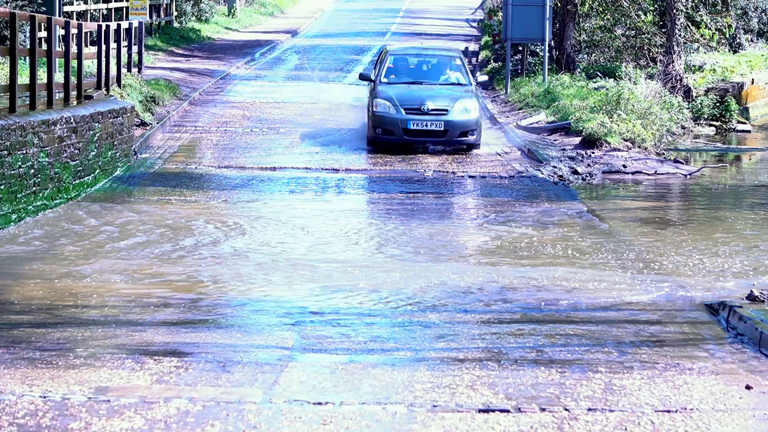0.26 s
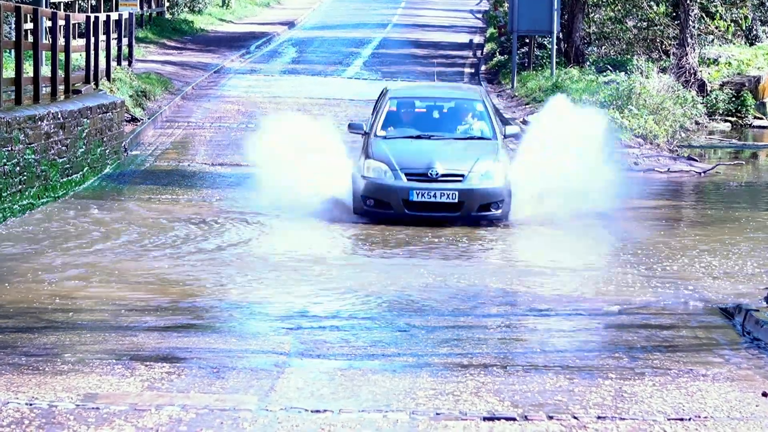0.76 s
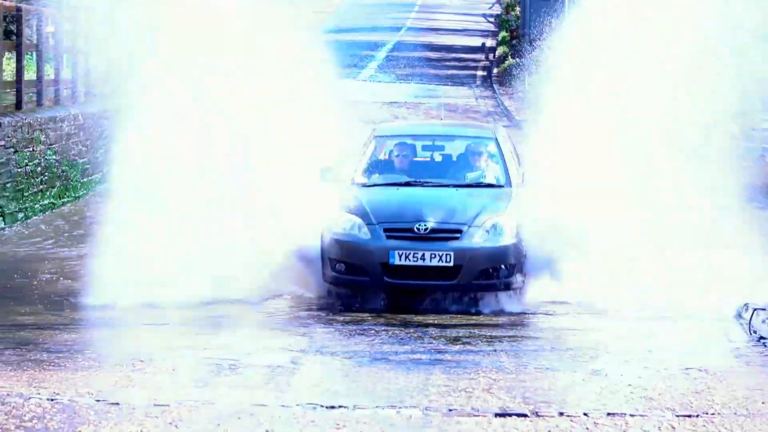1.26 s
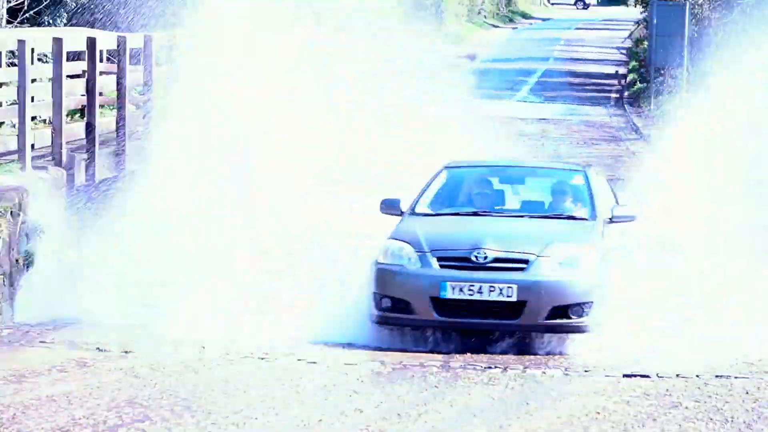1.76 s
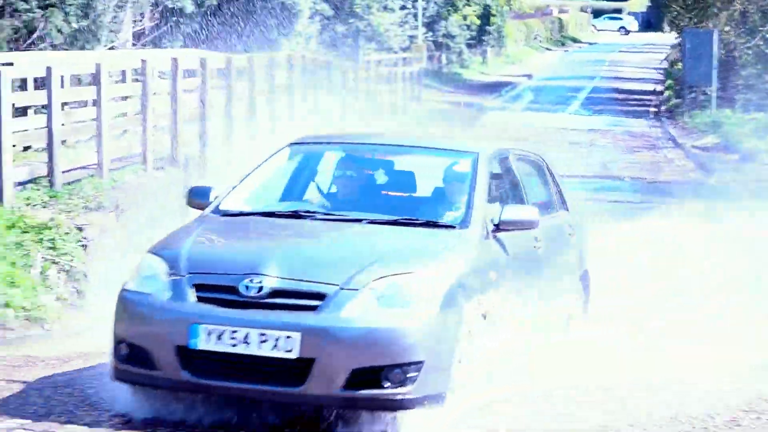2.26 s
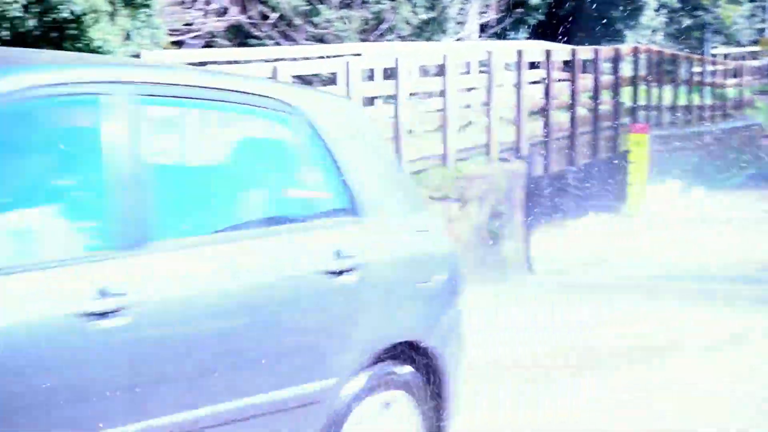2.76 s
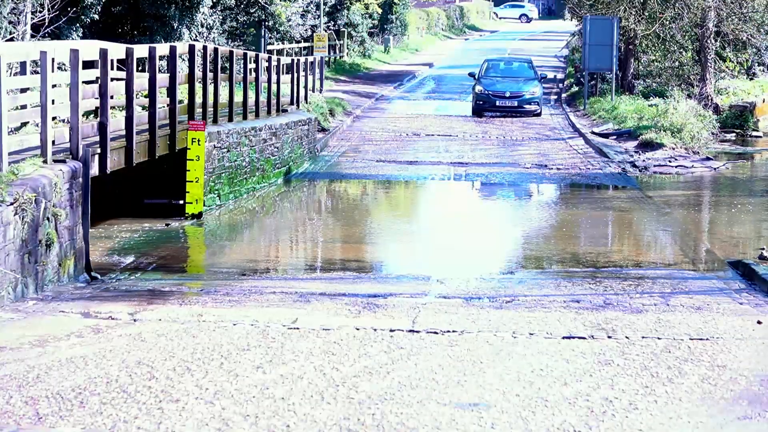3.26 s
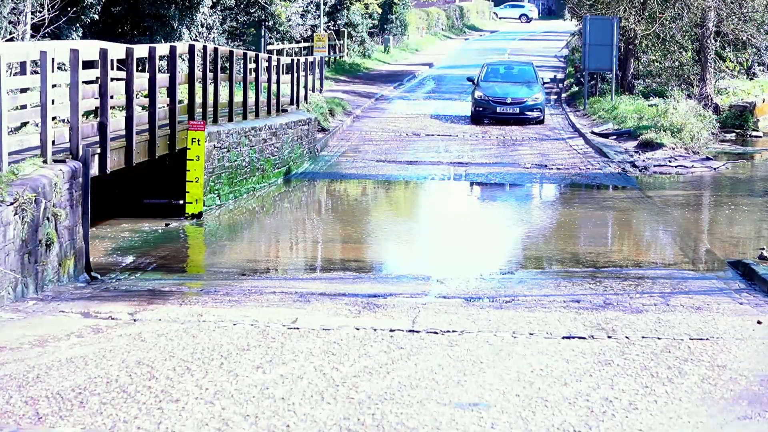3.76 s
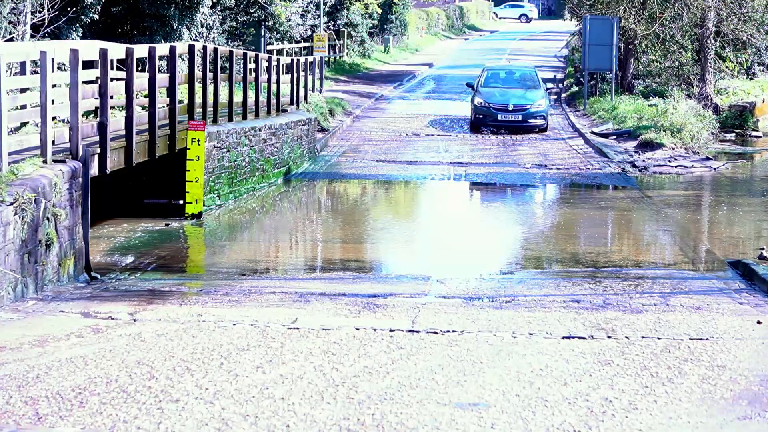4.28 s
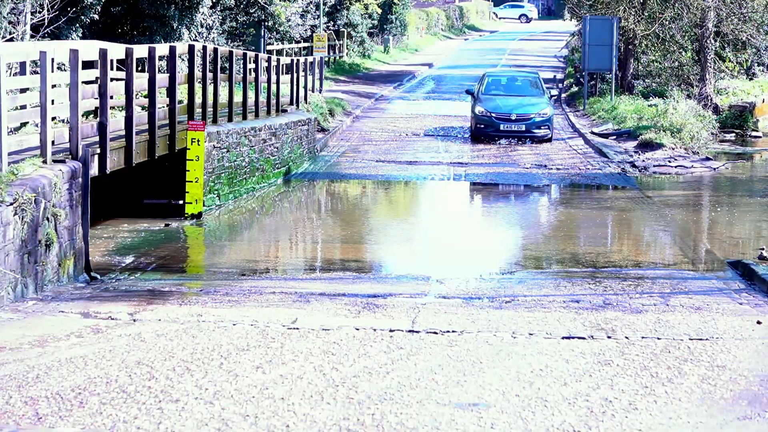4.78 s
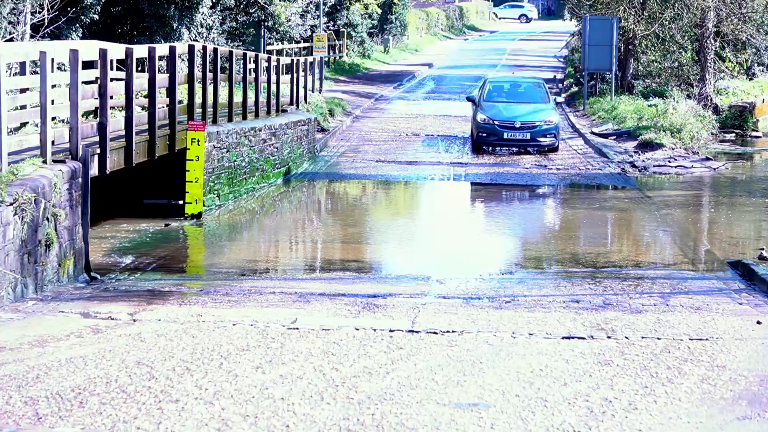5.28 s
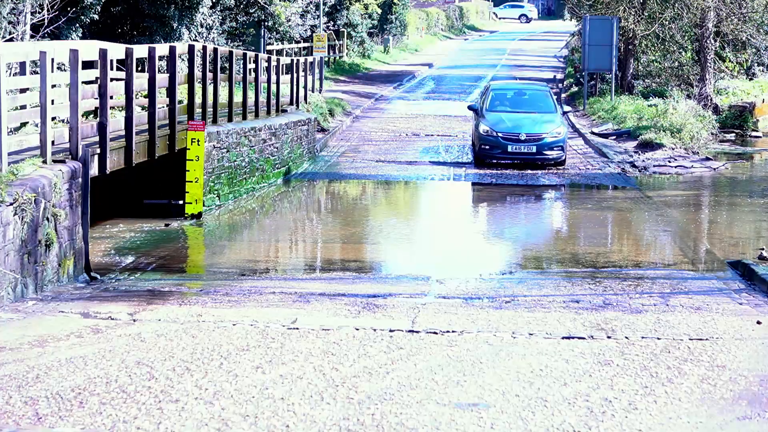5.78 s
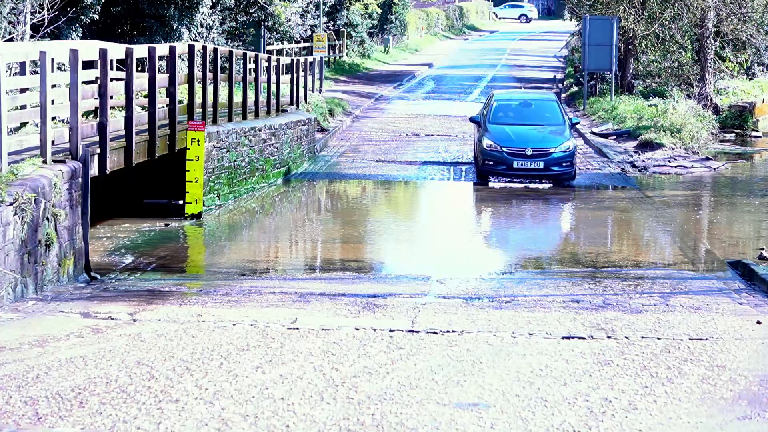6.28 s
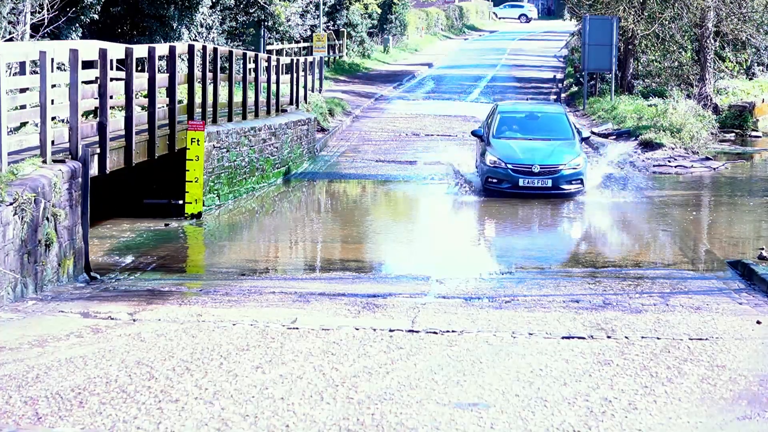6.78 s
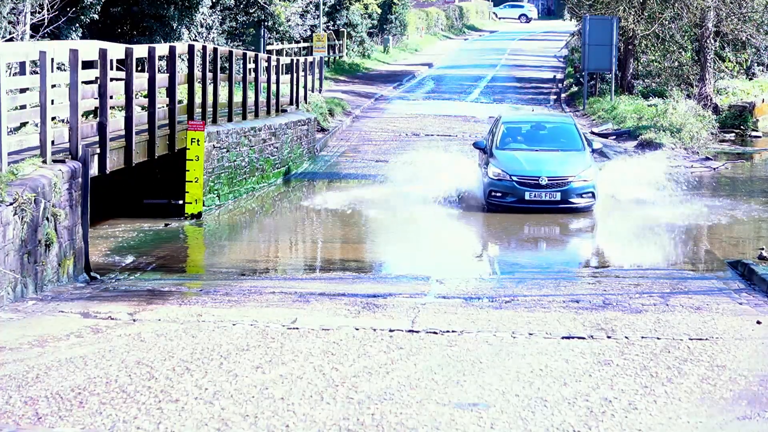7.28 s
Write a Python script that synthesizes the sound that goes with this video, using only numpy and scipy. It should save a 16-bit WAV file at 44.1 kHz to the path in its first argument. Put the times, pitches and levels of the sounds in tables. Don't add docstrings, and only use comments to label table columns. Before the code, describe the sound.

A fast car rushes through a shallow ford close to the microphone, its body booming and knocking while tyre roar becomes broad, fizzing spray with sharp slaps of water. It swells as the car passes, then cuts abruptly to a much quieter country lane: feet scrape and crunch on grit, small birds chirp with a light echo off trees, traffic hums far off, and a slow car enters the water with a soft wash and low bump.

```python
import sys
import numpy as np
from scipy import signal
from scipy.fft import rfft, irfft, next_fast_len
from scipy.io import wavfile
from scipy.ndimage import uniform_filter1d

SR = 44100
rng = np.random.default_rng(int(sys.argv[2]) if len(sys.argv) > 2 else 0)


def persist_wave(psi):
    counts = np.round(np.clip(psi, -1, 1) * 32767).astype(np.int16)
    wavfile.write(sys.argv[1], SR, np.atleast_2d(counts).T)


def volts_from_db(level):
    exponent = np.asarray(level, float) / 20
    return 10 ** exponent


N = 332514

START_S, CUT_S = 0.047, 2.8335

# (time [s], tyre roar [dB], stage [0-2])
FAST_PASS = [(0.05, -26.5, 0.069), (0.45, -27, 0.2), (0.88, -23, 0.97), (1.1, -25, 1.02), (1.3, -24.5, 1.4),
             (1.7, -25, 1.58), (1.97, -24, 1.38), (2.1, -21.5, 1.59), (2.5, -20.5, 1.54),
             (2.63, -19.5, 1.54), (2.67, -21.5, 1.4), (2.73, -20.5, 1.32), (2.84, -19.5, 1.8)]
# (frequency [Hz], level [dB])
FAST_RUMBLE_FAR = [(12, -52), (45, -35), (62, -2), (97, 4.5), (144, -0.5), (172, -1), (243, -2), (309, -3),
                   (365, -15.5), (420, -11.5), (550, -7.5), (920, -120)]
# (frequency [Hz], level [dB])
FAST_RUMBLE_NEAR = [(12, -40), (25, -22), (59, 1.5), (97, 0.5), (144, 2.5), (172, 1.5), (243, 0.5),
                    (309, -6), (365, -14.5), (420, -18), (550, -12), (920, -120)]
# (time [s], time [s])
RUMBLE_CLOSING = (2.2, 2.1)
# (frequency [Hz], level [dB])
FAST_ROAD = [(180, -37), (300, -42), (398, -4), (494, 0.5), (665, -4), (1530, -2), (1920, -9.5), (2200, -7),
             (2870, -1.5), (3220, -11), (4490, -15.5), (5660, -10.5), (6910, -19.5), (12800, -40),
             (15800, -94)]
# (frequency [Hz], level [dB])
FAST_BOW_WAVE = [(180, -18.5), (300, 0.5), (411, -20), (554, -1.5), (711, -11), (943, -9.5), (1250, -13),
                 (1500, -8), (2060, -14.5), (3680, -23.5), (5480, -19), (7020, -25.5), (12800, -34.5),
                 (14600, -53), (15800, -91)]
# (frequency [Hz], level [dB])
FAST_SPRAY = [(180, -17), (300, -3.5), (391, -30), (510, -3.5), (854, -8.5), (1010, -5), (1340, -7),
              (1600, -4.5), (2590, -2), (3380, -8.5), (5390, -13), (6360, -12.5), (7380, -9),
              (12800, -21.5), (15800, -3)]
# (time [s], fizz [dB], ring [dB], ring pitch [Hz], decay T60 [s])
WATER_SLAPS = [(0.256, -30, -24.5, 2860, 0.03), (0.277, -19, -36, 2500, 0.021),
               (0.294, -13, -28, 2970, 0.04), (0.389, -21.5, -36, 3000, 0.04),
               (0.484, -25, -32, 3500, 0.03), (0.545, -20, -26, 3480, 0.04), (0.576, -27, -31, 3500, 0.027),
               (0.3304, -17, -27, 2950, 0.073), (0.404, -14, -30, 2970, 0.043),
               (0.4938, -19.5, -37, 1480, 0.06), (0.5254, -20, -33, 608, 0.04),
               (0.558, -18, -26, 1520, 0.047), (0.61, -11.5, -22, 1100, 0.061), (1.22, -39, -21, 2460, 0.9),
               (2.51, -36, -14.5, 2330, 0.82), (2.02, -32, -14, 520, 0.15), (2.6515, -35, -11, 740, 0.055),
               (2.72, -16, -20, 2000, 1)]
# (time [s], peak [dB], pitch [Hz])
PAN_THUMPS = [
    (0.578, -17.5, 101),
    (0.808, -12.5, 550),
    (0.87, -16.5, 524),
    (0.955, -20, 107),
    (1.2, -27, 45),
    (1.37, -20, 250),
    (1.85, -17, 314),
    (2.22, -22, 170),
    (2.44, -18, 207),
    (2.53, -24, 178),
]
# (frequency [Hz], level [dB])
THIN_SPRAY = [(1500, -36), (3000, 3), (4500, 0.5), (6000, -1), (8500, -7.5), (11000, -13.5), (13000, -22),
              (16000, -41)]

# (start [s], length [s], first level [dB], last level [dB])
FOOT_DRAGS = [(2.82, 0.21, -55.5, -56.5), (2.98, 0.12, -64, -60), (3.09, 0.46, -52.5, -54.5),
              (3.557, 0.63, -64.5, -67), (4.195, 0.4, -74, -82), (4.66, 0.12, -76, -73),
              (4.753, 0.85, -71, -83), (4.83, .07, -68, -66), (4.967, 0.064, -65, -66),
              (5.542, 0.26, -73, -63), (5.87, .09, -62, -61), (5.982, .07, -56, -64),
              (6.05, 0.071, -57, -60), (6.085, 0.27, -57, -58), (6.167, 0.055, -61, -57),
              (6.32, 0.173, -57.5, -59), (6.49, 0.12, -53, -55), (6.66, 0.15, -56, -55)]
# (time [s], stage [0-2])
GROUND = [
    (2.85, 0),
    (3.5, 0.025),
    (3.6, 0.43),
    (4.7, 0.98),
    (4.85, 0.58),
    (5.6, 0.82),
    (5.9, 0.84),
    (6.0, 1.3),
    (6.1, 1.67),
    (6.9, 2.05),
]
# (frequency [Hz], level [dB])
GRIT_DRY = [(760, -45), (1300, -11), (1480, -26), (1890, -0.5), (2740, -2.5), (3100, -10), (3320, -13),
            (4830, -7), (5390, -13.5), (5970, -11.5), (7230, -16), (8580, -17), (9490, -26), (12500, -37),
            (14500, -58)]
# (frequency [Hz], level [dB])
GRIT_DULL = [(710, -42), (1200, 1.5), (1380, -0.5), (1610, -2), (1930, -14.5), (2490, -4.5), (3340, -6),
             (3640, -9.5), (5210, -8), (5730, -13), (7080, -20.5), (9230, -26.5), (15000, -57)]
# (frequency [Hz], level [dB])
GRIT_DAMP = [(800, -40), (1300, -3.5), (1750, -2), (2200, -7), (3300, -8), (5300, -6.5), (6500, -15.5),
             (9000, -15.5), (12500, -24), (14300, -50)]
# (time [s], ring [dB], ring pitch [Hz], hiss [dB])
FIRST_CRUNCHES = [(3.0405, -37, 2310, -50), (3.098, -50, 1980, -51), (3.1567, -42, 2660, -62),
                  (3.485, -23, 1806, -71), (3.535, -25, 2390, -47), (3.772, -34, 2330, -49),
                  (3.8622, -30, 2460, -71), (3.8791, -23, 2140, -51), (3.975, -28, 2120, -58),
                  (3.984, -28, 2556, -49), (4.072, -32, 2500, -54), (4.1081, -34, 2890, -57),
                  (4.1294, -27, 1990, -59), (4.187, -34, 1367, -51), (4.208, -27, 2700, -66),
                  (4.2294, -20, 1380, -67), (4.596, -28, 2796, -60), (4.619, -36, 2750, -80),
                  (4.6837, -30, 2430, -73), (4.7092, -22.5, 1400, -71)]
# (time [s], ring [dB], ring pitch [Hz], hiss [dB])
LATER_CRUNCHES = [(4.7526, -20.5, 2534, -54), (4.8378, -31, 5500, -53), (4.8688, -37, 1530, -63),
                  (4.9783, -40, 2800, -53), (5.0075, -32, 1480, -56), (5.1342, -29, 3420, -51.5),
                  (5.1542, -21.5, 1180, -52), (5.095, -44, 4400, -69), (5.166, -36, 3150, -54),
                  (5.19, -43, 2700, -61), (5.284, -48, 2960, -62), (5.47, -51, 2000, -64),
                  (5.51, -46, 2500, -62), (5.575, -44, 2400, -62), (5.607, -38, 2000, -60),
                  (5.657, -42, 4500, -61), (5.553, -37, 1665, -63), (5.693, -34, 1650, -53),
                  (5.7515, -22, 1170, -61), (5.791, -40, 1342, -52), (5.8965, -42, 1692, -55),
                  (5.9255, -19, 1400, -47.5), (5.9905, -23, 1720, -40.5), (6.0257, -23, 1360, -55),
                  (6.053, -24, 1365, -39.5), (6.1499, -30, 1730, -50), (6.1784, -23, 1670, -49),
                  (6.372, -30, 1748, -50), (6.4144, -25, 1590, -57), (6.4374, -30, 1390, -52),
                  (6.498, -44, 1897, -51), (6.5053, -32, 1500, -37), (6.5314, -32, 2524, -43),
                  (6.5444, -35, 1850, -41), (6.5827, -28, 1670, -46), (6.7308, -25, 1330, -48)]
# (time [s], peak [dB], ring pitch [Hz])
STONE_SNAPS = [(3.582, -40, 2660), (3.7954, -29, 1930), (3.9184, -34, 2320), (3.9444, -38, 2380),
               (4.0173, -29, 2550), (4.0412, -35, 2560), (4.0624, -37, 2680), (4.074, -21, 2487),
               (4.1174, -36, 2883), (4.1619, -30, 2470), (4.1924, -33, 2870), (4.2744, -39, 1905),
               (4.6194, -40, 2720), (4.753, -30, 2410), (4.813, -38, 2520), (4.8389, -30, 2620),
               (4.8724, -40, 2580), (4.9402, -40, 1940), (5.0958, -48, 1980), (5.1342, -24, 3440),
               (5.1664, -38, 3130), (5.1894, -38, 2710), (5.2844, -44, 2960), (5.754, -28, 1240),
               (6.025, -23, 1390), (3.78, -28, 2600), (4.7996, -42, 3630), (4.9457, -44, 3000),
               (5.938, -30, 1450), (5.977, -36, 1000), (5.9965, -28, 2600), (6.06, -30, 2000),
               (4.231, -29, 1380), (5.154, -26, 1200), (5.692, -30, 1600), (4.711, -35, 1500),
               (5.011, -35, 1500), (6.4435, -36, 1300), (6.5378, -29, 4200), (6.556, -33, 3000),
               (6.568, -35, 2500)]

# (start [s], length [s], from pitch [Hz], to pitch [Hz], level [dB])
BIRD_NOTES = [(4.342, 0.0202, 4450, 4520, -62), (4.376, .022, 4550, 4450, -63),
              (5.87, .035, 3750, 3550, -55), (6.08, .02, 5000, 5600, -58), (4.46, 0.05, 5350, 4950, -68),
              (4.5, .05, 5000, 5350, -72), (4.736, .05, 4500, 4440, -62), (4.78, .29, 4520, 4480, -78),
              (4.826, .02, 7150, 7000, -60), (4.842, 0.034, 6900, 5700, -53),
              (4.903, .025, 5350, 5450, -64), (4.93, 0.078, 5580, 5890, -52.5),
              (4.995, 0.117, 5860, 5900, -63), (5.075, 0.054, 4500, 4400, -65),
              (5.095, .025, 4150, 4100, -68), (5.208, 0.045, 5970, 5550, -52.5),
              (5.244, 0.025, 5500, 4550, -57), (5.262, .016, 4550, 4480, -56),
              (5.25, .035, 3850, 3800, -66), (5.308, .03, 4750, 4400, -56), (5.34, .02, 3200, 4580, -56),
              (5.356, 0.044, 4760, 4330, -51.5), (5.4, 0.055, 4720, 4650, -66),
              (5.665, 0.046, 5400, 5140, -58), (5.735, 0.086, 5360, 4950, -58),
              (5.937, 0.055, 4000, 3940, -53), (6.102, .014, 6800, 6200, -43),
              (6.113, .042, 6200, 6670, -46), (6.158, .042, 6780, 5000, -46),
              (6.285, .028, 5800, 5450, -56), (6.307, 0.0375, 5460, 4900, -50),
              (6.388, .022, 5550, 4960, -53), (6.41, 0.031, 5420, 5000, -55),
              (6.475, .022, 4000, 4000, -61), (6.599, 0.036, 4400, 4430, -47),
              (6.644, .018, 4400, 4030, -54), (6.674, 0.039, 5100, 6250, -50),
              (6.694, .016, 6000, 5250, -47), (6.73, .018, 5430, 5350, -54),
              (6.792, .018, 3930, 4520, -45.5), (6.801, 0.034, 4490, 4400, -44),
              (6.848, 0.034, 4380, 4530, -55), (6.945, 0.045, 5430, 5300, -57)]

# (time [s], tyre roar [dB])
LANE_ROAR = [
    (2.85, -50),
    (3.3, -51.5),
    (3.7, -48.5),
    (4.45, -49),
    (4.7, -47.5),
    (6.3, -48.5),
    (7.05, -46.5),
    (7.25, -43),
    (7.54, -44),
]
# (time [s], stage [0-3])
LANE_STAGES = [(2.8, 0), (3.3, .2), (3.75, .9), (4.2, 1.1), (4.6, 1.9), (5.5, 2.08), (5.93, 2.55),
               (6.05, 2.74), (6.45, 2.75), (6.62, 2.79), (6.75, 2.85), (7.3, 2.84), (7.54, 2.95)]
# (frequency [Hz], level [dB])
LANE_BODY = [(12, -52), (20, -20), (92, 1.5), (140, 4), (168, -6.5), (208, -3), (237, -7), (262, -11),
             (360, -20), (420, -5), (550, -19), (920, -120)]
# (frequency [Hz], level [dB])
LANE_HIDDEN = [(180, -26), (300, 2.5), (380, -16), (520, -2), (640, 2), (830, -3), (1000, 1.5), (1230, -1),
               (1430, -3), (1740, -7), (2640, -14), (4060, -32), (6910, -48), (15800, -92)]
# (frequency [Hz], level [dB])
LANE_CROSSING = [(180, -22), (300, -5), (360, -7), (470, 0.5), (620, -1.5), (760, -8.5), (950, 4),
                 (1090, 1), (1230, -10), (1430, -3.5), (1740, -8), (2640, -3), (4060, -30), (6910, -54),
                 (15800, -92)]
# (frequency [Hz], level [dB])
LANE_LEAVING = [(180, -25), (300, -0.5), (370, -17.5), (447, 6), (660, -7), (897, 0), (1090, -0.5),
                (1230, -12), (1430, -6), (1740, -11.5), (2640, -22), (4060, -31), (4640, -37), (6910, -54),
                (15800, -99)]
# (frequency [Hz], level [dB])
LANE_WATER = [(180, -5), (300, -3.5), (391, -16.5), (583, 0.5), (699, -8.5), (943, -6.5), (1020, -14),
              (1210, 2), (1500, -10.5), (1710, -4), (3500, -12), (5570, -9), (12600, -16), (14100, -35),
              (15800, -77)]
# (pitch [Hz], width [Hz], level [dB])
ENGINE_HUMS = [
    (88.8, 6.6, -52.5),
    (234.8, 13, -59),
    (469, 25, -60),
]
# (time [s], peak [dB], pitch [Hz])
DIP_THUMPS = [
    (3.53, -40.5, 330),
    (4.24, -39, 99.5),
    (5.96, -35.5, 500),
    (6.72, -32.5, 450),
    (6.84, -45, 106),
    (7.47, -25.5, 124.3),
    (7.48, -30, 483),
]

# (frequency [Hz], likeness [0-1])
LIKENESS = [(60, 0.982), (200, 0.984), (380, 0.982), (700, 0.94), (1290, 0.9), (2380, 0.64), (4400, 0.58),
            (8120, 0.42), (15000, 0.34)]
# (frequency [Hz], phase [rad])
PORT_LEAD = [(600, 0.01), (950, -.2), (3100, 0.3), (4820, -0.05), (8960, 0.4), (9820, .7), (12400, 0.3)]
# (frequency [Hz], left over right [dB])
PORT_LEAN = [(60, 1.3), (130, -0.6), (290, 0.5), (640, 0), (1410, -2.5), (3100, -1.0), (5400, -0.8),
             (15000, -1)]
# (frequency [Hz], level [dB])
HOUSING = [(2400, -0.61), (2950, 0.5), (3250, -1), (4400, -1), (5400, 1.5), (6400, -2), (10500, -1.43)]


def fast_car():
    s, roar_db, stage = np.transpose(FAST_PASS)
    rumble_db = roar_db - 3.5 + 1.3 * stage
    out = wash([FAST_RUMBLE_FAR, FAST_RUMBLE_NEAR], (RUMBLE_CLOSING, np.arange(2)), (s, rumble_db),
               (40, 350), patchy_db=-1.1, flicker_db=-0.5, size=2048)
    out += wash([FAST_ROAD, FAST_BOW_WAVE, FAST_SPRAY], (s, stage), (s, roar_db),
                (400, 3200), patchy_db=1.5, flicker_db=0.88)
    first_spray_db = np.interp(np.arange(N) / SR, [0.25, 0.29, 0.46, 0.49, 0.62, 0.7],
                               [-49, -44, -41, -38, -46, -62])
    sheets = volts_from_db(first_spray_db)[None]
    for at, fizz_db, ring_db, hz, t60 in WATER_SLAPS:
        add(sheets, at, volts_from_db(fizz_db - 15.5) * burst(t60)[None])
        add(out, at, ring(ring_db + 2.5, hz, burst(t60), width=500))
    fizz = wash([THIN_SPRAY], (s, 0 * s), (s, 0 * s), (6000, 14000), patchy_db=2, flicker_db=1.2, size=256)
    return out + sheets * fizz + thumps(PAN_THUMPS)


def feet():
    grains = evened(uniform_filter1d(rng.exponential(1, N // 64 + 1) - 1, size=3))
    grains_db = np.interp(np.arange(N), np.arange(len(grains)) * 64, 2.2 * np.minimum(grains, 2))
    crunch, snap_t60_s = burst(t60=0.036, rise=0.0026), 0.017
    snap = burst(snap_t60_s, rise=0.0006)

    loose_per_s, loose_db, loose_spread_db, loose_dull_db = 110, -6.5, 3.8, 4
    struck = rng.random(N) < loose_per_s / SR
    loose = struck * volts_from_db(loose_db + loose_spread_db * np.minimum(rng.exponential(1, N), 2))
    s, ground = np.transpose(GROUND)
    loose = loose * volts_from_db(loose_dull_db * np.interp(np.arange(N) / SR, s, np.minimum(ground, 1)))
    snapping = signal.oaconvolve(loose, burst(t60=0.025))[:N] / 4
    force = (scuffs() * (volts_from_db(grains_db - 6) + snapping))[None]

    out = np.zeros((2, N))
    for at, ring_db, hz, hiss_db in list(FIRST_CRUNCHES) + list(LATER_CRUNCHES):
        add(force, at, volts_from_db(hiss_db - 2.5) * crunch[None])
        add(out, at, ring(ring_db - 9.5, hz, crunch, width=510))
    for at, db, hz in STONE_SNAPS:
        add(force, at, volts_from_db(db - 35) * snap[None])
        upper_ring = ring(db - 13, 5100, snap, width=1200)
        add(out, at, ring(db - 6, hz, snap, width=910) + upper_ring)
    grit = wash([GRIT_DRY, GRIT_DULL, GRIT_DAMP], (s, ground), (s, 0 * s), (6500, 11000),
                patchy_db=2.5, flicker_db=1.14, size=256, count=700)
    return out + force * grit


def scuffs():
    rise_s, fall_s, still_db = 0.022, 0.046, -79
    t, weight = np.arange(N) / SR, np.full(N, volts_from_db(still_db))
    for start, length, first_db, last_db in FOOT_DRAGS:
        end = start + length
        down = np.clip(np.minimum((t - start) / rise_s, (end - t) / fall_s), 0, 1)
        weight += down * volts_from_db(np.interp(t, [start, end], [first_db, last_db]))
    return weight * (t < sum(FOOT_DRAGS[-1][:2]))


def birds():
    rise_bend, fall_bend = 0.69, 1.4
    slide_loss_db, quick_hz_per_s = 3, 57000
    out = np.zeros((2, N))
    for start, length, from_hz, to_hz, db in BIRD_NOTES:
        noise = rng.standard_normal((2, SR // 3))[:, :round(length * SR)]
        bend = rise_bend if to_hz > from_hz else fall_bend
        hz = from_hz + (to_hz - from_hz) * np.linspace(0, 1, noise.shape[1]) ** bend
        tremble = 1 + 0.06 * uniform_filter1d(noise[0], size=60)
        tone = np.sqrt(2) * np.sin(2 * np.pi * np.cumsum(hz * tremble) / SR)
        tone = tone * signal.windows.tukey(len(hz), 0.25)
        leaves = np.minimum(evened(uniform_filter1d(noise[1], size=200)), 1)
        tone = tone * volts_from_db(4.5 * leaves)
        tone = tone * volts_from_db(-slide_loss_db * np.tanh(abs(np.gradient(hz)) * SR / quick_hz_per_s))
        add(out, start, tone * volts_from_db([[db + 5], [db - 3]]))
    t = np.arange(SR // 2) / SR
    trees = rng.standard_normal((2, len(t))) * volts_from_db(-60 * t / 0.39) * (t > 0.012)
    echo = signal.fftconvolve(out, trees / np.linalg.norm(trees[0]), axes=1)[:, :N]
    return out + volts_from_db(-8) * echo


def lane():
    traffic_rumble_db, slow_rumble_db, enters_s, rumble_grows_s = -50.5, -44.5, 6.4, 0.39
    splash_s, splash_db, splash_t60_s = 6.497, -48.5, 0.83
    s, roar_db = np.transpose(LANE_ROAR)
    when = np.array([s[0], enters_s, enters_s + rumble_grows_s, s[-1]])
    rumble_db = np.repeat([traffic_rumble_db, slow_rumble_db], 2)
    out = wash([LANE_BODY], (s, 0 * s), (when, rumble_db), (40, 350), patchy_db=0.5, flicker_db=0, size=2048)
    for hz, width, db in ENGINE_HUMS:
        hum = signal.lfilter(*signal.iirpeak(hz, hz / width, SR), rng.standard_normal(N))
        out += volts_from_db(db) * evened(hum)
    out += wash([LANE_HIDDEN, LANE_CROSSING, LANE_LEAVING, LANE_WATER], np.transpose(LANE_STAGES),
                (s, roar_db), (400, 1100), patchy_db=0.8, flicker_db=0.4, size=1024)
    t = np.arange(N) / SR - splash_s
    fan = (t > 0) * volts_from_db(splash_db - 60 * abs(t) / splash_t60_s)
    out += fan * wash([THIN_SPRAY], (s, 0 * s), (splash_s + np.arange(2), np.zeros(2)), (6000, 14000),
                      patchy_db=4.5, flicker_db=1.5, size=256)
    return out + thumps(DIP_THUMPS)


def thumps(blows):
    body_q, body_cycles, body_rise_s = 1.7, 42, 0.013
    out = np.zeros((2, N))
    for at, db, hz in blows:
        t60 = np.sqrt(body_cycles / hz) / 2
        add(out, at, ring(db, hz, burst(t60, body_rise_s), hz / body_q))
    return out


def ring(db, hz, shape, width):
    noise = rng.standard_normal(len(shape)) + 0.12 * rng.standard_normal((2, len(shape)))
    hollow = signal.iirpeak(hz, hz / width, SR)
    sound = signal.lfilter(*hollow, signal.lfilter(*hollow, shape * noise))
    small = signal.butter(2, hz / 2, "high", fs=SR)
    sound = signal.lfilter(*small, signal.lfilter(*small, sound))
    return volts_from_db(db) * sound / abs(sound).max()


def burst(t60, rise=0.00063):
    t = np.arange(5000) / SR
    fall = volts_from_db(-60 * t / max(t60, 0.01))
    tail = 0.086 * volts_from_db(-60 * t / 0.27)
    return (1 - np.exp(-(t / rise) ** 2)) * (fall + tail)


def wash(colours, stage, level, band, patchy_db, flicker_db, size=512, count=6000):
    hop = size // 4
    first = int(max(level[0][0] - 0.1, 0) * SR)
    last = int(min(level[0][-1] + 0.1, N / SR) * SR)
    frames, hz = (last - first) // hop + 5, np.fft.rfftfreq(size, 1 / SR)
    t = (first + np.arange(frames) * hop) / SR
    a, b, c, d, patches = rng.standard_normal((frames, len(hz), 5)).T
    patches = uniform_filter1d(patches, size=size // 80, axis=0)
    patches = evened(uniform_filter1d(patches, size=count // hop, axis=1))
    flicker = np.minimum(evened(uniform_filter1d(rng.exponential(1, frames) - 1, size=3)), 2)

    place = np.clip(np.interp(t, *stage), 0, len(colours) - 1)
    colour_db = 0
    for k, spectrum in enumerate(colours):
        share = np.maximum(1 - abs(place - k), 0)
        colour_db = colour_db + read(spectrum, hz)[:, None] * share
    colour = volts_from_db(colour_db)
    in_band = (hz >= band[0]) & (hz < band[1])
    colour = colour / np.sqrt((colour[in_band] ** 2).sum(0))

    same = np.clip(read(LIKENESS, hz), 0, 1)[:, None]
    left, other = a + 1j * b, c + 1j * d
    lagged = left * np.exp(-1j * read(PORT_LEAD, hz))[:, None]
    z = np.array([left, same * lagged + np.sqrt(1 - same ** 2) * other])
    z *= colour * volts_from_db(patchy_db * patches + flicker_db * flicker)
    out = np.zeros((2, N))
    out[:, first:last] = signal.istft(z, nperseg=size, noverlap=size - hop)[1][:, :last - first]
    unit = np.sqrt(3 / 2)
    return unit * out * volts_from_db(np.interp(np.arange(N) / SR, *level))


def evened(x):
    return x / np.sqrt(np.mean(x ** 2) + 1e-20)


def read(points, hz):
    f, value = np.transpose(points)
    return np.interp(np.log(hz + 1), np.log(f + 1), value)


def add(mix, s, sound):
    part = mix[:, round(s * SR):][:, :sound.shape[1]]
    part += sound[:, :part.shape[1]]


def scene():
    t = np.arange(N) / SR
    begun = np.clip((t - START_S) / 0.0016, 0, 1)
    second = np.clip((t - CUT_S) / 0.0037, 0, 1)
    return begun * (1 - second) * fast_car() + second * (feet() + birds() + lane())


def top_cut(x):
    return signal.sosfilt(signal.butter(12, 15740, fs=SR, output="sos"), x)


def record(dry):
    size = next_fast_len(N)
    hz = np.fft.rfftfreq(size, 1 / SR)
    lean_db = read(PORT_LEAN, hz) / 2
    port_gain = volts_from_db(read(HOUSING, hz) + [lean_db, -lean_db])
    ports = irfft(rfft(dry, size) * port_gain, size)[:, :N]
    mix = ports * (np.arange(N) > START_S * SR)
    return top_cut(mix)


dry = scene()
out = record(dry)
persist_wave(out)
```